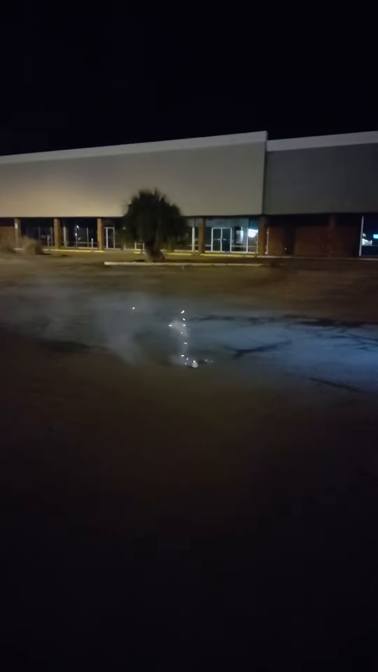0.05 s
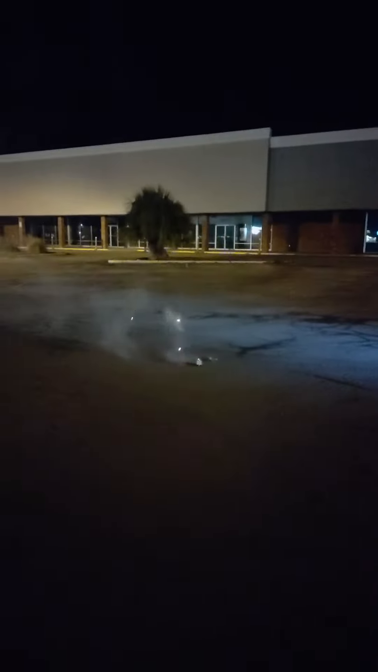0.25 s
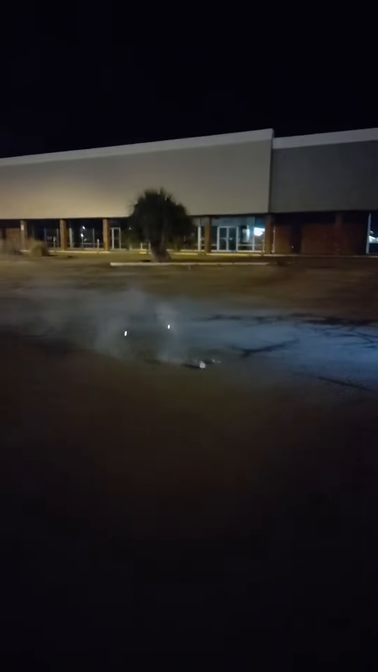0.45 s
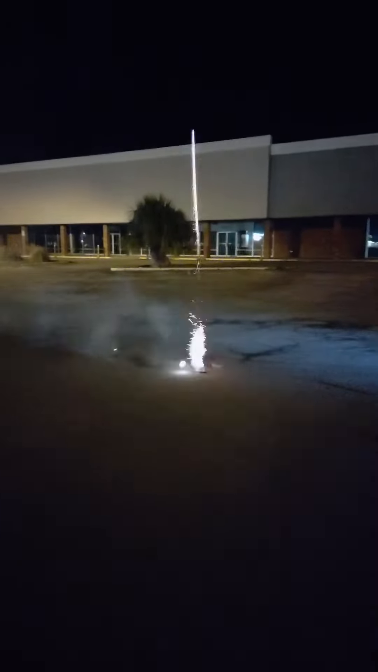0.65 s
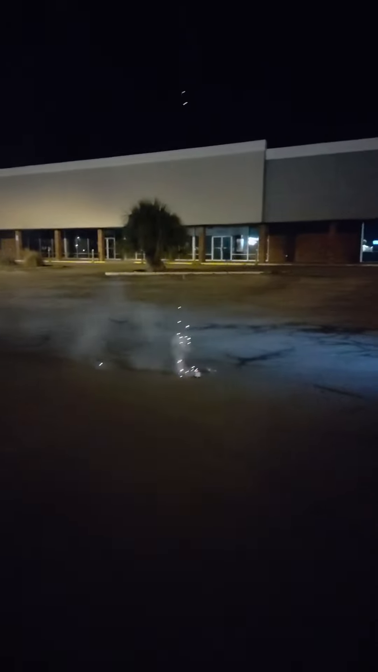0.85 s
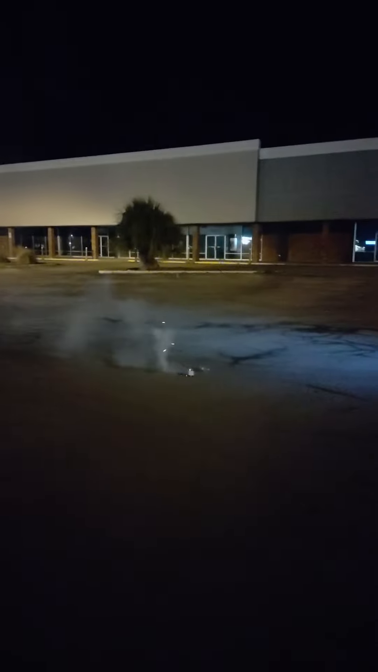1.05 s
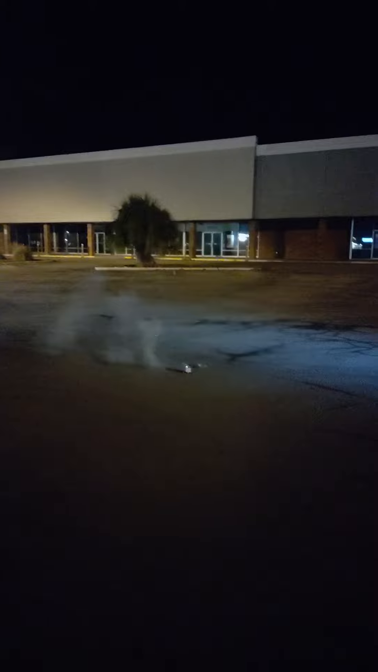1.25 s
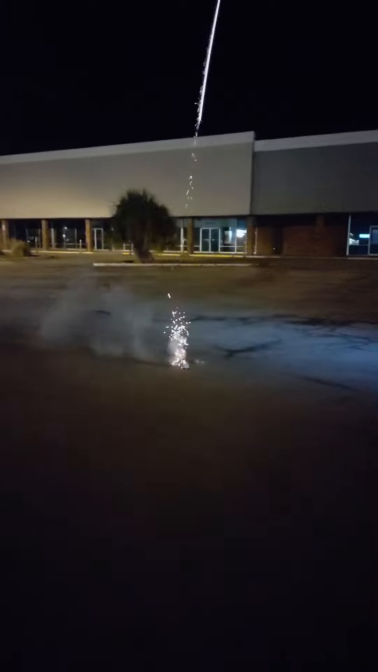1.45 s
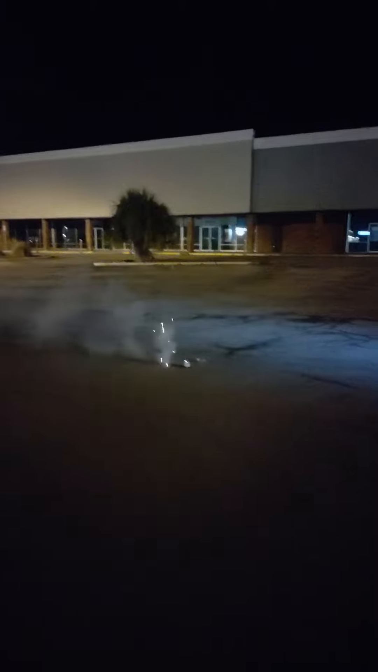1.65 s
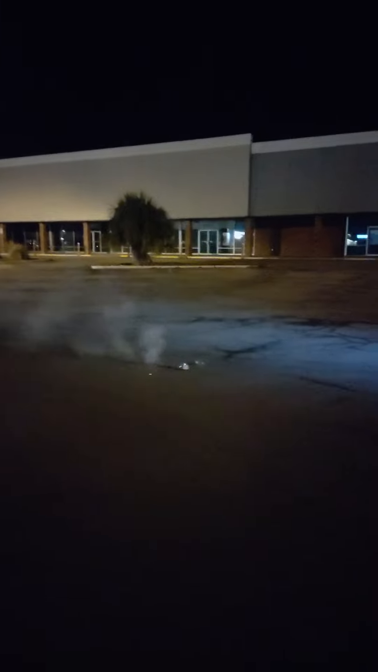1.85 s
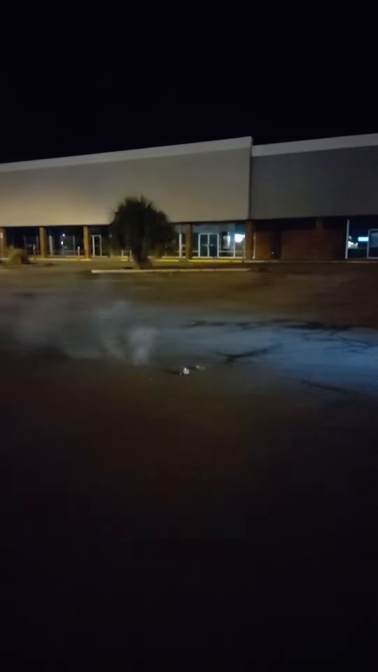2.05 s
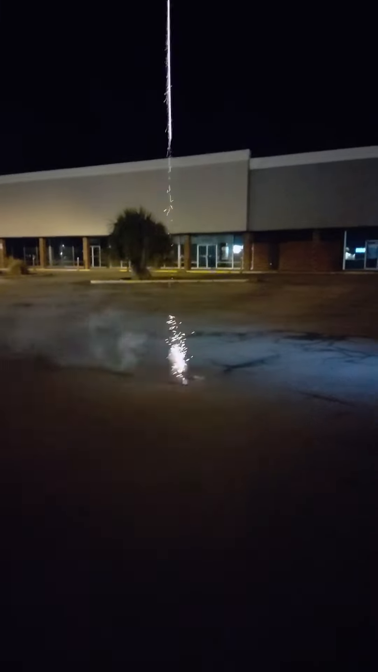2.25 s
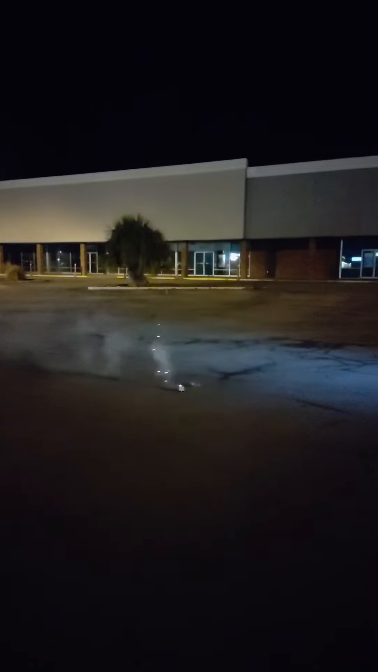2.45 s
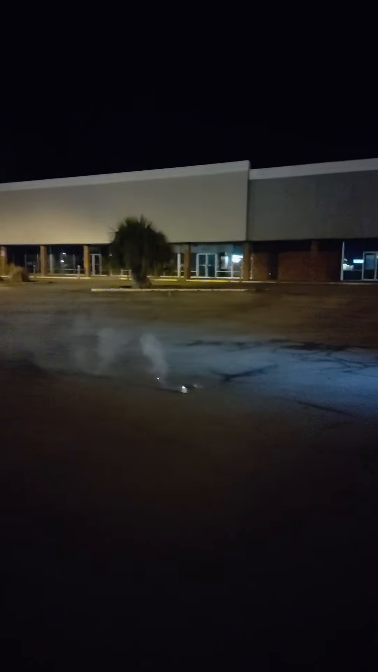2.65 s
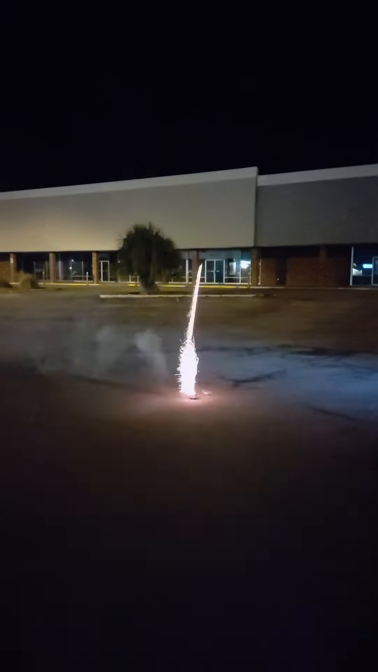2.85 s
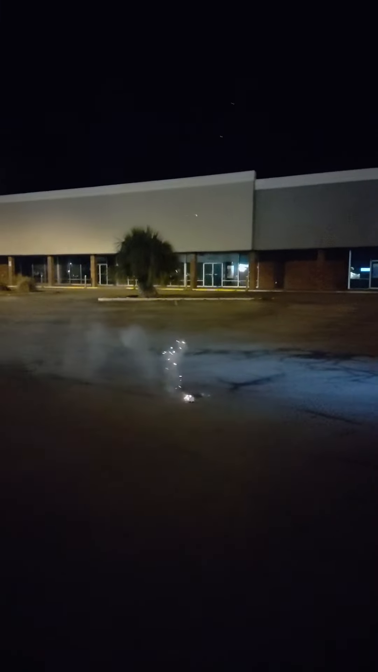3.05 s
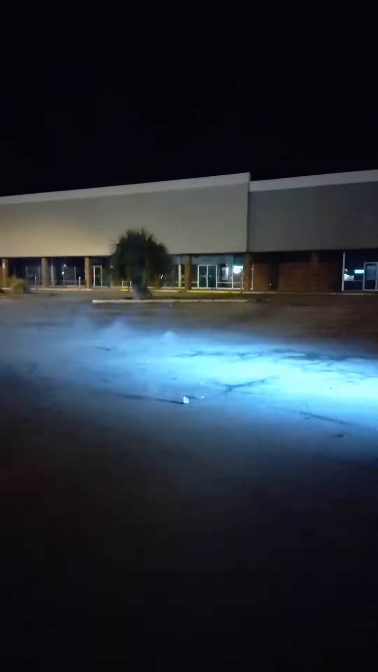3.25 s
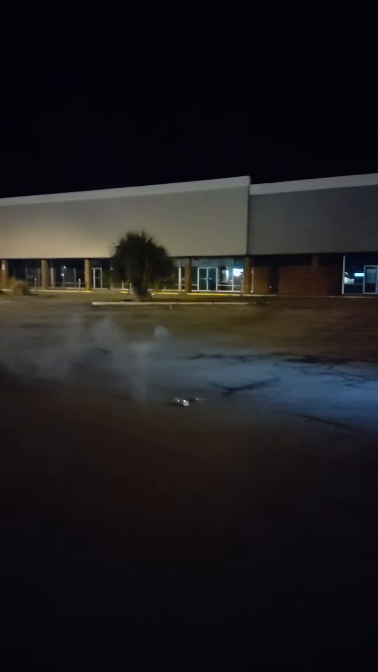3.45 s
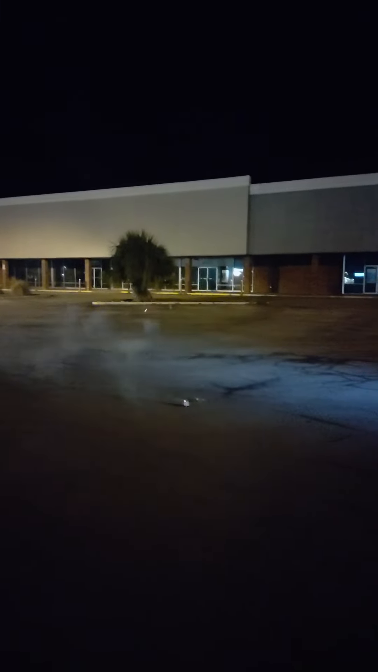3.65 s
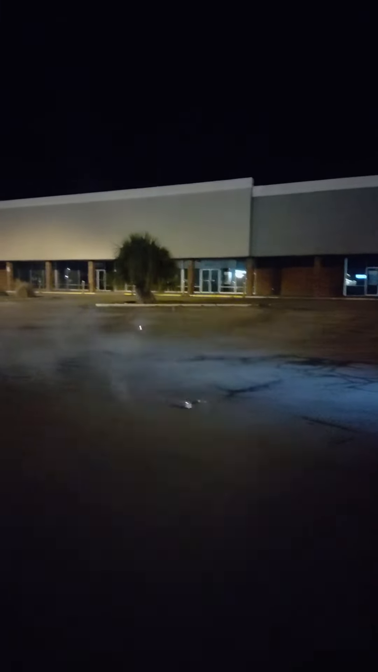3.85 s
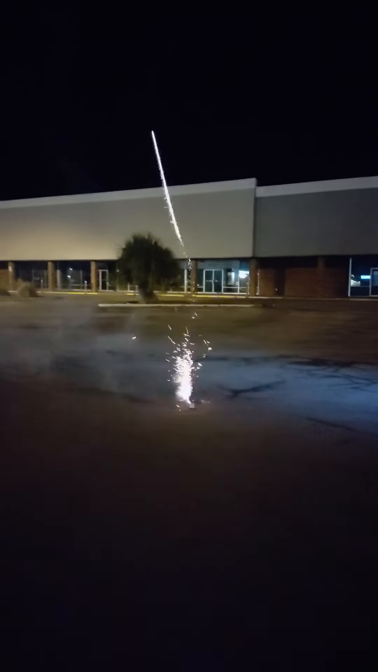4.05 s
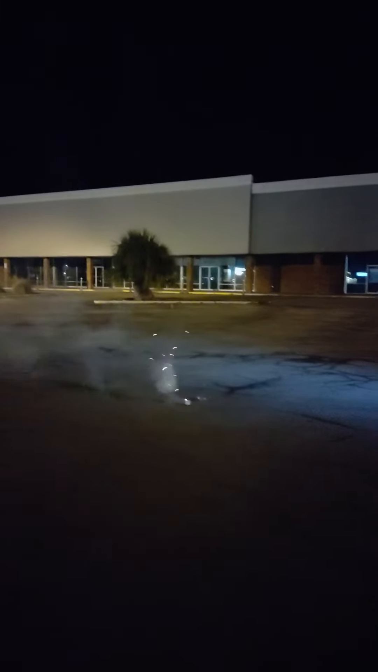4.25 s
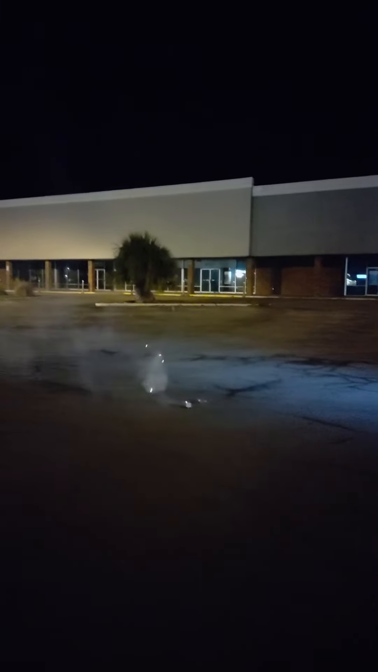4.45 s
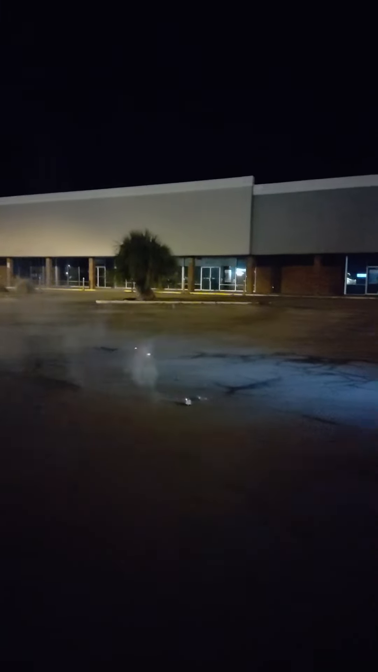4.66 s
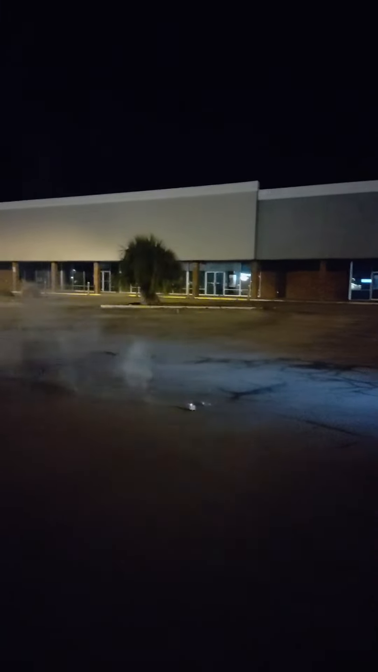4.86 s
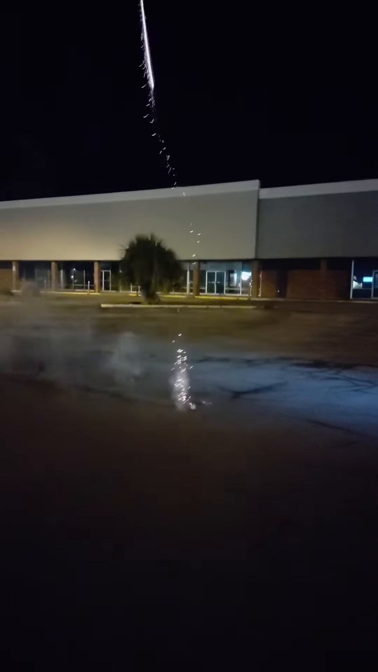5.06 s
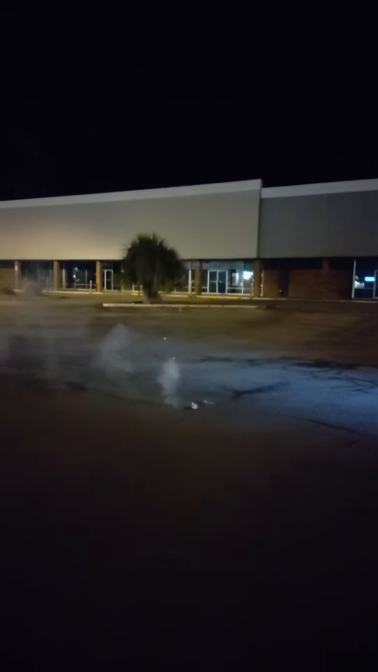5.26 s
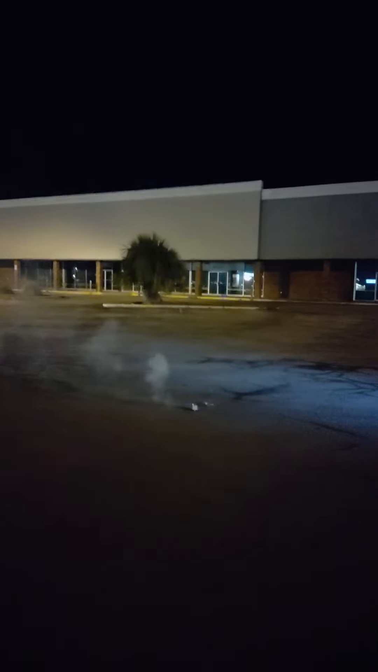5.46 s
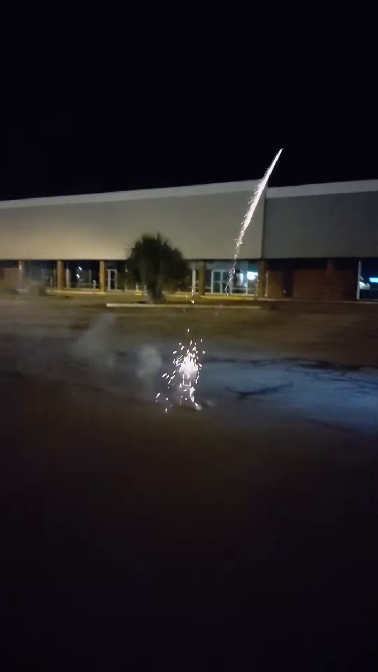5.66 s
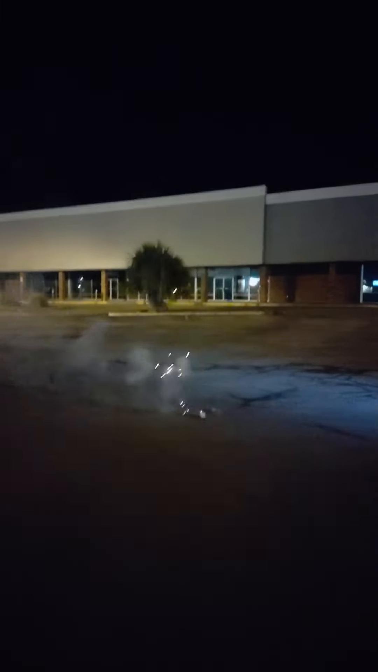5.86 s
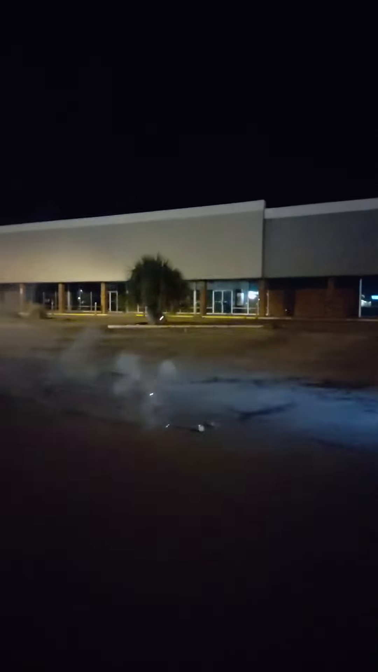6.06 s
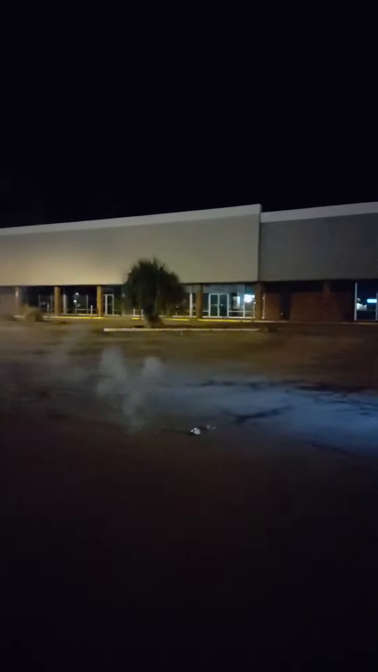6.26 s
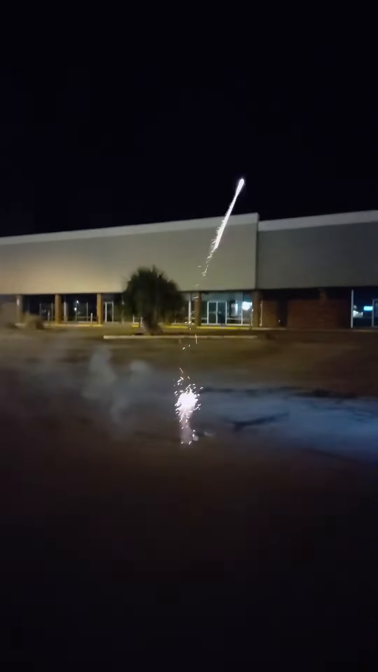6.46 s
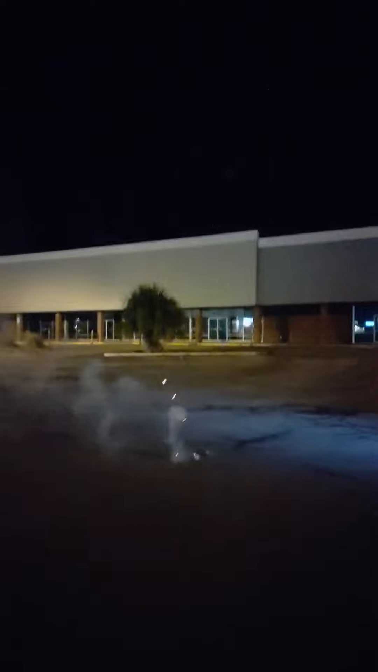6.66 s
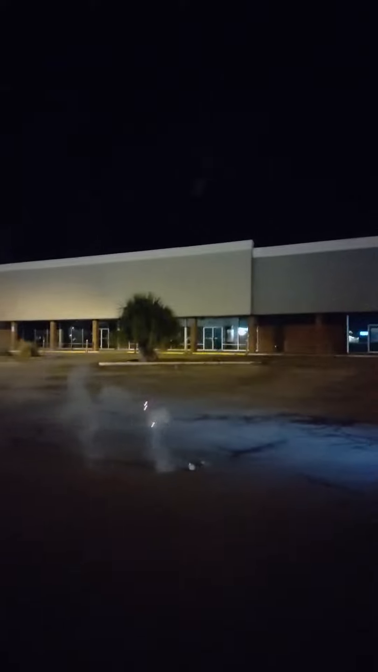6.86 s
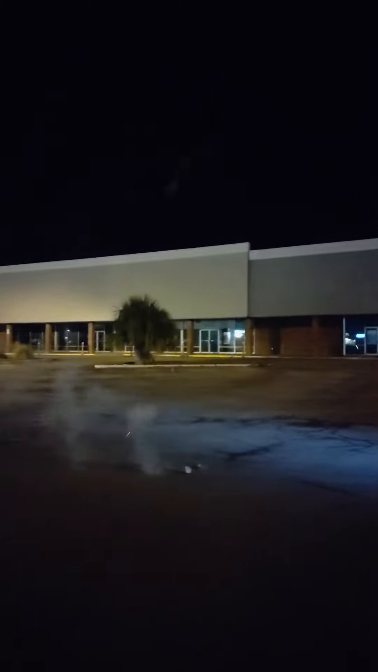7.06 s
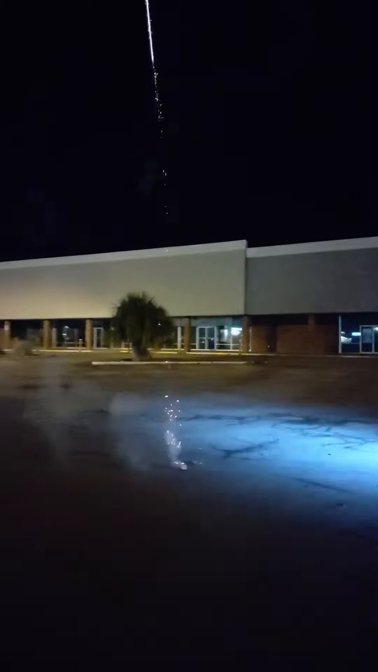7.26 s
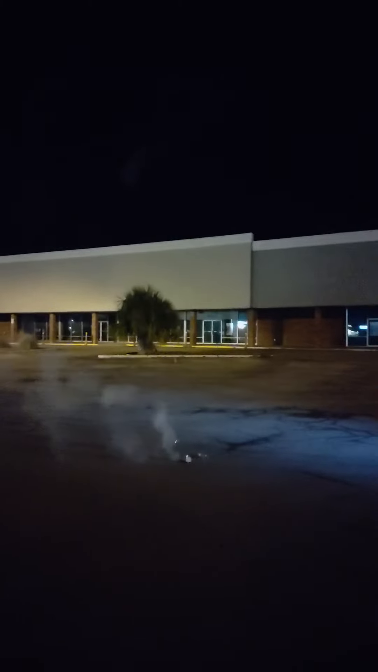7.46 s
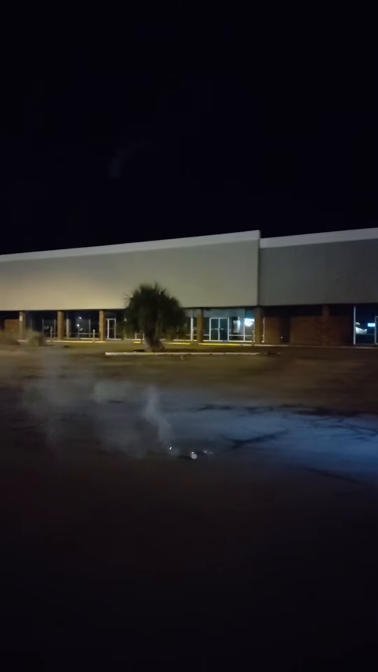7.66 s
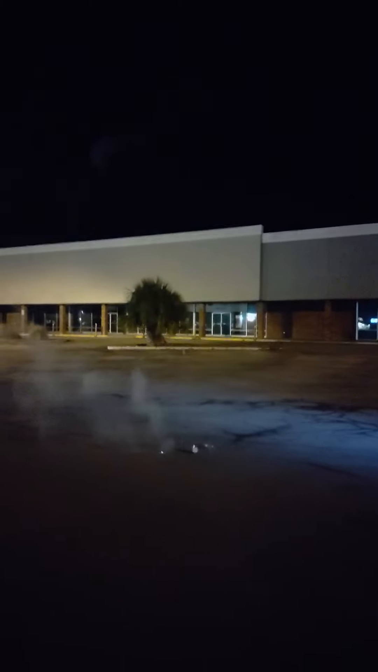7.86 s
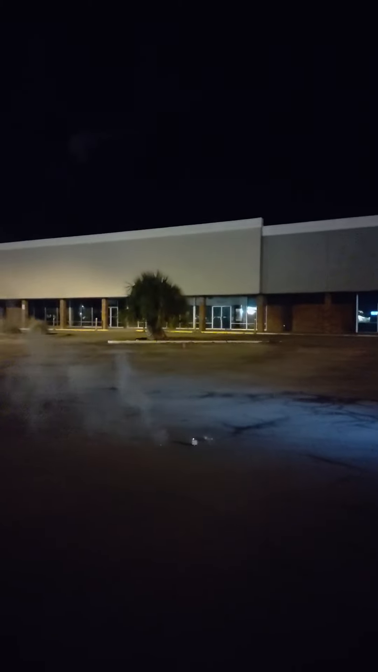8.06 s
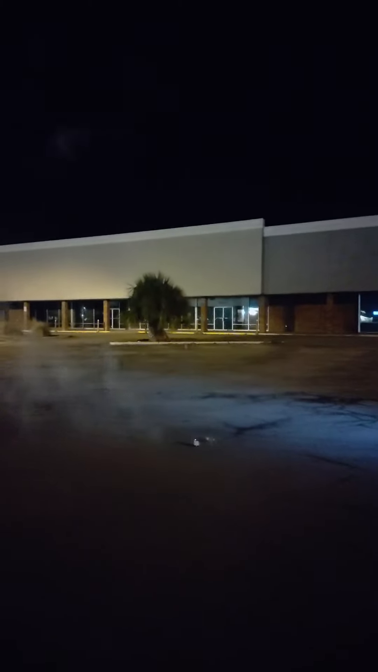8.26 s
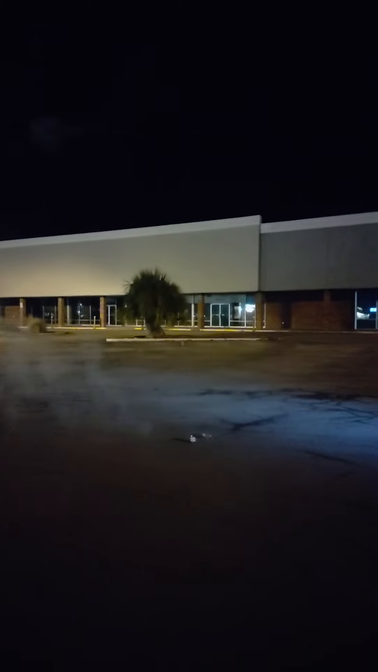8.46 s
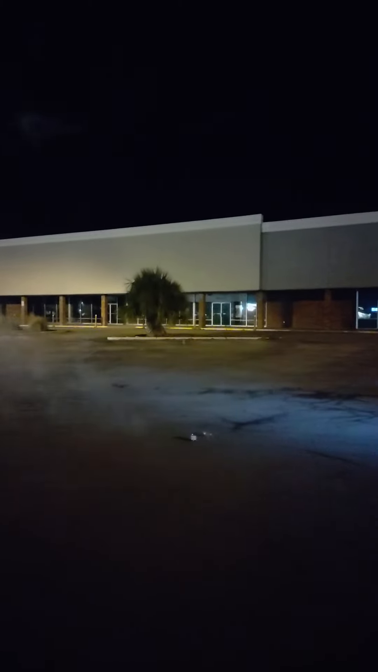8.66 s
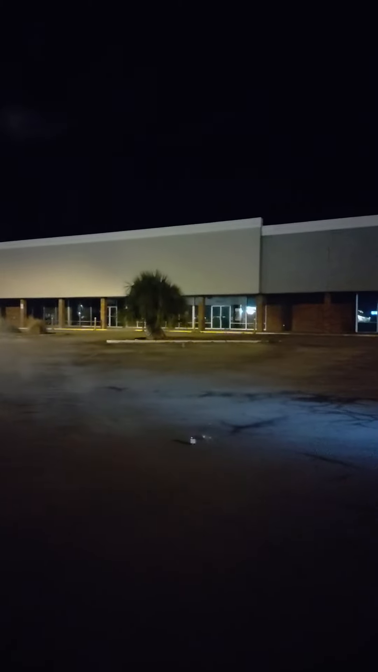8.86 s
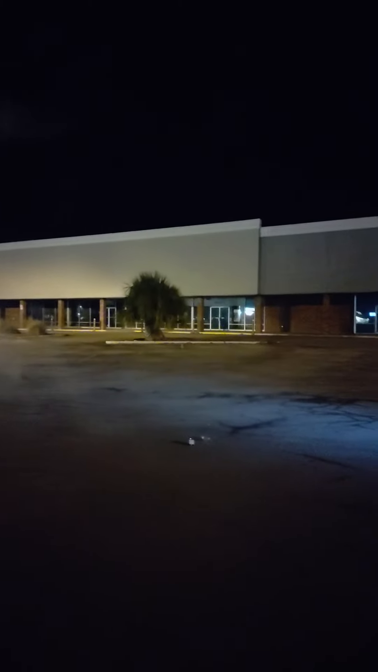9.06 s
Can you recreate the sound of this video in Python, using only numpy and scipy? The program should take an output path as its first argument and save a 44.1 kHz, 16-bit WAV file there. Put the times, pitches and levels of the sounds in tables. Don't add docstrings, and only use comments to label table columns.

```python
import sys
import numpy as np
from scipy import signal
from scipy.fft import rfft, irfft, next_fast_len
from scipy.io import wavfile
from scipy.ndimage import uniform_filter1d

SR = 44100
rng = np.random.default_rng(int(sys.argv[2]) if len(sys.argv) > 2 else 0)


def transcribe(signal):
    frames = np.atleast_2d(signal).T
    limited = np.clip(frames, -1, 1)
    pcm = np.round(limited * 32767).astype(np.int16)
    wavfile.write(sys.argv[1], SR, pcm)


def gain_from_decibels(decibels):
    exponent = np.asarray(decibels, float) / 20
    return 10 ** exponent


N = 402633

# (frequency [Hz], level [dB])
CRACK_SPECTRUM = [(60, -15.5), (500, -10.5), (1400, -6.5), (1750, -2), (2800, -9.5), (4800, -8), (6200, -7),
                  (8000, -26)]
# (frequency [Hz], level [dB])
POP_SPECTRUM = [(60, -10.5), (300, -2.5), (900, -2), (1750, 1), (2600, -10.5), (4500, -11.5), (8000, -29.5)]
# (frequency [Hz], level [dB])
LOT_SPECTRUM = [(30, -47), (100, -24), (300, -26), (600, -14), (1300, -11), (1750, 1.5), (2300, -13),
                (3300, -19), (4600, -10), (6300, -21), (7600, -15), (8400, -48.5)]


def evened(x):
    return x / np.sqrt(np.mean(x ** 2) + 1e-20)


def read(points, hz):
    f, value = np.transpose(points)
    return np.interp(np.log(hz + 1), np.log(f + 1), value)


def add(mix, start_s, sound):
    part = mix[max(round(start_s * SR), 0):][:len(sound)]
    part += sound[:len(part)]


def click(points, size=1024):
    hz = abs(np.fft.fftfreq(size, 1 / SR))
    log_gain = np.log(gain_from_decibels(read(points, hz)))
    spectrum = np.exp(np.conj(signal.hilbert(log_gain)))
    pulse = np.fft.ifft(spectrum).real[:size // 2]
    return pulse / abs(pulse).max()


def puff(size, ms, wake):
    t = np.arange(size) / SR
    return (t == 0) + wake * rng.standard_normal(size) * np.exp(-1000 * t / ms)


def coloured(x, points):
    size = next_fast_len(len(x))
    gain = gain_from_decibels(read(points, np.fft.rfftfreq(size, 1 / SR)))
    return evened(irfft(rfft(x, size) * gain, size)[:len(x)])


def wander(count, hz):
    return evened(signal.lfilter(*signal.butter(2, hz, fs=SR), rng.standard_normal(count)))


def night_air():
    # (frequency [Hz], level [dB])
    air_spectrum = [(30, -24), (100, 8), (300, -1.5), (1000, -11), (1750, -7.5), (3000, -40.5), (5000, -32),
                    (6500, -28), (7600, -30.5), (8400, -49.5)]
    level_db = -50 + 1.5 * wander(N, 5)
    return gain_from_decibels(level_db) * coloured(rng.standard_normal(N), air_spectrum)


def lot_tail(colour, lumpy_db=0.5, rise_s=.03):
    # (frequency [Hz], t60 [s])
    ringing = [(100, 3.9), (1000, 2), (2000, 1.69), (3200, 1.394), (5000, 1), (6500, 0.91), (8000, 0.87)]
    t = np.arange(3 * SR // 2) / SR
    uneven_db = lumpy_db * wander(len(t), 59) + 2.05 * wander(len(t), 420)
    taps = rng.standard_normal(len(t)) * gain_from_decibels(uneven_db)
    hz, frame_s, z = signal.stft(coloured(taps, colour), SR, nperseg=256)
    decay_db = -60 * frame_s / read(ringing, hz)[:, None]
    tail = signal.istft(z * gain_from_decibels(decay_db), SR, nperseg=256)[1][:len(t)]
    return tail * (1 - np.exp(-t / rise_s))


def slaps():
    # (time [s], peak level [dB])
    slap_events = [(0.213, -21), (0.232, -13), (.257, -6), (0.283, -12), (1.066, -20), (1.096, -15),
                   (1.128, -11), (1.928, -13), (1.968, -12.5), (2.793, -21), (2.819, -18.5), (3.545, -38),
                   (3.583, -15), (3.617, -16.5), (4.141, -27.5), (4.572, -19.5), (6.125, -4.5),
                   (6.141, -11.5), (6.155, -10.5), (6.85, -25), (7.51, -13.5), (7.618, -10), (7.744, -15.5),
                   (7.876, -20), (7.939, -18), (8.228, -37), (8.265, -33), (8.476, -15.5), (8.517, -17),
                   (8.905, -46)]
    out = np.zeros(N)
    for s, db in slap_events:
        treble = max(-0.3 * (db + 23.5), 0)
        smear = puff(size=5000, ms=4.5, wake=.9)
        trail = puff(size=5000, ms=30, wake=0.1)
        pulse = click(LOT_SPECTRUM) + 0.51 * click(POP_SPECTRUM) + treble * click(CRACK_SPECTRUM)
        sound = signal.fftconvolve(pulse, smear + trail)
        add(out, s, gain_from_decibels(db + 3.5) * sound / abs(sound).max())
    return out


def strand(t, hz, db, octave_db):
    turn = np.exp(2j * np.pi * np.cumsum(hz) / SR)
    beads = [1.4 + wander(len(t), 45) + 1j * wander(len(t), 45) for _ in range(2)]
    line = gain_from_decibels(db + 6.0) * (turn * beads[0] + gain_from_decibels(octave_db) * turn ** 2 * beads[1])
    return line.real * np.clip(np.minimum(t, t[-1] - t) / 0.0024, 0, 1)


def strands():
    # (start [s], length [s], pitch [Hz], top level [dB], fade [dB/s])
    lingers = [(0.177, 0.46, 3024, -33, 38), (0.884, 0.11, 3200, -43, 3), (1.24, 0.35, 3220, -39.5, 74),
               (1.666, 0.26, 3074, -38.5, 5), (1.978, 0.29, 3070, -40, 47), (3.25, 0.21, 3145, -34, 24),
               (3.484, 0.58, 3095, -48.5, 32), (4.356, 0.606, 3008, -33.5, 54.5),
               (5.259, 0.333, 2983, -37, 17), (6.245, 0.12, 3060, -44, 29), (6.615, .14, 3164, -40, -7),
               (7.552, 0.99, 3034, -35, 52.5)]
    # (start [s], length [s], from [Hz], to [Hz], level [dB])
    chirps = [
        (2.654, 0.065, 3310, 3410, -44),
        (3.367, 0.082, 3030, 3210, -45),
        (4.5, 0.03, 3450, 3500, -36),
        (4.533, .02, 3480, 3900, -34),
        (6.064, 0.013, 3080, 4040, -32.5),
        (6.66, .012, 3300, 4060, -41),
        (6.784, 0.0081, 3360, 4100, -40),
    ]
    out = np.zeros(N)
    for s, length_s, hz, db, fade in lingers:
        t = np.arange(0, length_s, 1 / SR)
        top_s = 0.11 * length_s
        swell_db = -8.5 * np.maximum(1 - t / top_s, 0)
        level_db = db + swell_db - fade * np.maximum(t - top_s, 0)
        sagging_hz = hz * (1 - .04 * t + 0.01 * wander(len(t), 15))
        add(out, s, strand(t, sagging_hz, level_db, octave_db=-15.5 - 41 * t))
    for s, length_s, low_hz, high_hz, db in chirps:
        t = np.arange(0, length_s, 1 / SR)
        rising_hz = low_hz + (high_hz - low_hz) * (t / length_s) ** 0.56
        add(out, s, strand(t, rising_hz, db, octave_db=-19))
    return out


def bursts():
    # (time [s], ground echo lag [s], echo level [dB], boom level [dB], first wall lag [s])
    burst_events = [(0.1276, 0.0072, -18, -32, .094), (0.9663, 0.0075, -23, -62, 0.084),
                    (1.8066, 0.0088, -24, -47.5, 0.074), (2.7144, 0.0088, -24, -68, 0.092),
                    (3.4558, 0.0078, -25.5, -40.5, 0.08), (4.0437, 0.0084, -31, -51.5, 0.1),
                    (5.0564, 0.009, -77, -61, 0.095), (5.9536, .0081, -20.5, -75.5, .09),
                    (6.7512, 0.0075, -25, -71, 0.09), (7.3784, 0.0065, -20, -39.5, 0.1),
                    (8.38, 0.0085, -27.5, -45, .065)]
    near, far = np.zeros((2, N))
    t = np.arange(SR // 2) / SR
    ring = np.sin(2 * np.pi * 100 * t)
    lead = np.sin(2 * np.pi * 1800 * t[:220]) * np.hanning(220)
    for s, ground_s, echo_db, boom_db, wall_s in burst_events:
        for delay_s, loss_db in ((0, 0), (ground_s, -1.5)):
            shock = np.convolve(click(CRACK_SPECTRUM), puff(size=600, ms=.65, wake=.8))
            add(near, s + delay_s - .0003, gain_from_decibels(3 + loss_db) * shock / abs(shock).max())
        add(near, s - .006, gain_from_decibels(-19) * lead)
        add(far, s + ground_s, gain_from_decibels(echo_db - 16) * lot_tail(LOT_SPECTRUM, rise_s=0.003))
        add(far, s + wall_s, gain_from_decibels(echo_db) * lot_tail(LOT_SPECTRUM, rise_s=0.0093))
        add(near, s - .005, gain_from_decibels(boom_db + 17.0) * ring * np.exp(-t / 0.015))
        add(near, s + 0.04456, gain_from_decibels(boom_db - 1) * ring * (t / 0.021) ** 2 * np.exp(-t / 0.044))
        add(near, s + 0.1199, gain_from_decibels(boom_db) * ring * np.minimum(t / 0.015, 1) * np.exp(-t / 0.035))
    return near, far


def pops():
    # (time [s], peak level [dB], echo level [dB])
    pop_events = [(0.604, -10, -27.5), (0.681, -10.5, -42.5), (0.686, 1.5, -60), (1.447, -0.5, -41.5),
                  (2.264, 3, -43), (2.927, 1, -45.5), (3.983, -13.5, -28.5), (4.073, -4.5, -18.5),
                  (4.996, -6, -19.5), (5.649, -7.5, -31), (6.451, -1.5, -48), (7.205, -1, -44)]
    near, far = np.zeros((2, N))
    for s, db, echo_db in pop_events:
        thump = np.convolve(click(POP_SPECTRUM), puff(size=900, ms=3.5, wake=.1))
        add(near, s, gain_from_decibels(db - 1.5) * thump)
        add(far, s + 0.0028, gain_from_decibels(db + echo_db) * lot_tail(LOT_SPECTRUM, rise_s=0.043))
    return near, far


def burn(pitch, lit_s, levels, voice):
    # (middle [s], half length [s], fifth above [dB])
    stutters = [(0.01, 0.16, -19), (0.888, 0.078, -26.5), (1.474, .04, -29), (1.725, .08, -30),
                (2.431, 0.065, -21), (2.621, 0.021, -25.5), (2.969, 0.031, -47), (4.237, 0.25, -22),
                (5.073, 0.087, -16), (5.693, 0.058, -28), (7.257, 0.01, -35)]
    out_s, *whistle_db = levels
    octave, coast_octave, jet_lit, jet_out, third_db = voice
    s, hz = np.transpose(pitch)
    t = np.arange(max(lit_s, 0), s[-1], 1 / SR)
    marks_s = [lit_s, out_s, out_s + .008, s[-1] + .001]
    db = np.interp(t, marks_s, whistle_db)
    octave_db = db + np.interp(t, marks_s, [octave, octave, coast_octave, coast_octave - 7])
    octave_db -= 7 * np.exp(-((t - lit_s) / 0.09) ** 2)
    steady_db = -56.5
    spells = [top - (top - steady_db) * np.minimum(((t - mid) / half) ** 2, 1)
              for mid, half, top in stutters]
    fifth_db = np.max(spells, axis=0)
    jet_db = np.interp(t, marks_s, [jet_lit, jet_out, -17, -17])
    return t, np.interp(t, s, hz), db, octave_db, fifth_db, jet_db, out_s, third_db


def whistle(flight, lit_s, climb):
    # (frequency [Hz], level [dB])
    jet_spectrum = [(60, -60), (1500, -25), (2400, -10), (3600, -4), (4500, 5), (5400, -1.5), (6800, 4),
                    (7600, 0.5), (8500, -31)]
    first, beat_hz, slowing_s, wall_db, blur_db = climb
    t, hz, db, octave_db, fifth_db, jet_db, out_s, third_db = flight
    count = len(t)
    age_s = np.maximum(t - lit_s, 0)
    beat = beat_hz / (1 + (age_s / slowing_s) ** 2) * (1 + .12 * wander(count, 41))
    catch = first / (1 + (age_s / .009) ** 7) * (1 + .25 * wander(count, 490))
    flutter = 0.029 * np.exp(-abs(t - out_s) / 0.011) * abs(wander(count, 140))
    turns = np.cumsum(hz * (1 + catch + flutter + .003 * wander(count, 70))) / SR
    lag = np.cumsum(beat) / SR + rng.random()
    ground = .62 * (1 - .6 * np.exp(-(age_s / .055) ** 2))
    ground = ground * np.interp(t, [out_s, out_s + .03], [1, .45])
    whole = ((1, db), (2, octave_db), (3, octave_db + third_db))
    halves = ((1 / 2, fifth_db - 24), (3 / 2, fifth_db), (5 / 2, fifth_db - 14.5))
    tone = 0
    for k, level_db in (*whole, *halves):
        direct = np.sin(2 * np.pi * k * (turns + lag / 2))
        reflected = ground * np.sin(2 * np.pi * k * (turns - lag / 2))
        level = gain_from_decibels(level_db + 1.78 * wander(count, 73))
        tone = tone + level * (direct + reflected) * np.sqrt(2 / (1 + ground ** 2))
    hiss = coloured(rng.standard_normal(count), jet_spectrum)
    jet = gain_from_decibels(db + jet_db + 2.0 * wander(count, 44)) * hiss
    sound = (tone + jet) * np.clip(np.minimum(age_s / 0.002, (t[-1] - t) / 0.005), 0, 1)
    to_walls = sound * gain_from_decibels(wall_db - 84 * age_s) * np.minimum(age_s / 0.16, 1) ** 2
    to_blur = sound * gain_from_decibels(blur_db - 8 * age_s)
    return sound, to_walls, to_blur


def rockets():
    lit_times = [-.15, .6945, 1.4565, 2.274, 2.935, 4.092, 5.009, 5.664, 6.461, 7.221]
    # (time [s],
    # pitch [Hz])
    pitches = [
        [(0, 2920), (.1, 2700), (.184, 2630), (.19, 2950)],
        [(.708, 2930), (.745, 3173), (.89, 2825), (1.046, 2630), (1.1, 2660), (1.108, 2790), (1.169, 3060),
         (1.25, 2904)],
        [(1.47, 2970), (1.51, 3056), (1.56, 2937), (1.73, 2590), (1.83, 2540), (1.882, 3020), (1.98, 2908)],
        [(2.283, 3015), (2.407, 2890), (2.447, 2706), (2.48, 2770), (2.497, 3100), (2.56, 3070), (2.63, 2990),
         (2.7, 3090)],
        [(2.987, 3022), (3.197, 2736), (3.225, 2703), (3.245, 2936), (3.3, 3045), (3.4, 2885)],
        [(4.122, 3023), (4.19, 2900), (4.31, 2638), (4.34, 2683), (4.346, 3200), (4.372, 3090), (4.392, 3820)],
        [(5.022, 3014), (5.1, 3150), (5.235, 2884), (5.254, 2720), (5.262, 3510)],
        [(5.69, 3054), (5.762, 2966), (5.885, 2794), (5.9, 2635), (5.912, 2770), (5.922, 3300)],
        [(6.474, 3037), (6.538, 2970), (6.592, 2872), (6.605, 3470)],
        [(7.234, 3040), (7.258, 3117), (7.294, 2997), (7.375, 2844), (7.498, 2653), (7.55, 2796)],
    ]
    # (burn-out [s], lit [dB], burn-out [dB], coast start [dB], last [dB])
    burn_levels = [(0.173, -8, -20.5, -15, -32), (1.102, -11.5, -19, -18, -28.5),
                   (1.83, -12, -18.5, -19.5, -28.5), (2.479, -11, -16.5, -20.5, -30.5),
                   (3.225, -10.5, -15.5, -14.5, -31), (4.339, -12, -17.5, -21.5, -15),
                   (5.254, -11, -12.5, -17.5, -32.5), (5.905, -11.5, -16, -13, -20.5),
                   (6.59, -11, -17, -15, -39), (7.519, -11, -20.5, -22, -43)]
    # (octave [dB], coasting octave
    # [dB], jet hiss when lit [dB], jet hiss at burn-out [dB], third partial [dB])
    voices = [(-3, -7, -10.5, -2.5, -28), (-2, -8.5, -10.5, -13, -22), (-1, -11, -14, -6.5, -17.5),
              (-2, -3, -10, -14.5, -29.5), (-4, -7, -9.5, -15, -30.5), (-2.5, -2.5, -13, -11.5, -31),
              (-6, 4, -17, -11.5, -27), (-2.5, -8.5, -11.5, -18, -34.5), (0, -11, -9, -14.5, -30),
              (-3.5, 3.5, -14.5, -3, -23)]
    # (first note above pitch [0-1], ground beat [Hz], beat slowing [s], wall echo [dB], blur [dB])
    climbs = [(0.6, 110, 0.25, -14.5, -12), (.22, 140, 0.15, -15, -11), (.18, 123, 0.16, -11.5, -15.5),
              (.1, 100, 0.2, -19, -7), (.2, 140, 0.12, -18, -12), (.05, 95, .19, -21, -10.5),
              (0.2, 130, 0.283, -13, -11), (.13, 190, 0.088, -26.5, -4), (.18, 103, 0.43, -25, -6.5),
              (.12, 107, 0.18, -15, -8.5)]
    # (lag [s], level [dB])
    wall_echoes = [(.075, -22.5), (0.17, 12.5), (0.201, -1), (0.263, 7.5), (0.332, -0.5), (0.451, -24)]
    # (frequency [Hz], level [dB])
    blur_spectrum = [(1000, -14.5), (2750, -13), (2980, -10), (3150, 1.5), (3400, 0), (5600, -17),
                     (6100, -4), (6600, -3), (8500, 0)]
    near, to_walls, to_blur, far = np.zeros((4, N))
    for pitch, lit_s, levels, voice, climb in zip(pitches, lit_times, burn_levels, voices, climbs):
        flight = burn(pitch, lit_s, levels, voice)
        for mix, sound in zip((near, to_walls, to_blur), whistle(flight, lit_s, climb)):
            add(mix, lit_s, sound)
    for lag_s, db in wall_echoes:
        add(far, lag_s, gain_from_decibels(db) * to_walls)
    blur = lot_tail(blur_spectrum, rise_s=0.12)
    blur = blur / np.linalg.norm(blur)
    return near, far + gain_from_decibels(-8.0) * signal.fftconvolve(to_blur, blur)[:N]


def ducking(loud, start_db, depth, fall_db):
    power_db = 10 * np.log10(abs(uniform_filter1d(loud ** 2, size=60)) + 1e-12)
    fall = np.arange(N) * fall_db / SR
    held_db = np.maximum.accumulate(power_db + fall) - fall
    over_db = np.maximum(held_db - start_db, 0)
    return gain_from_decibels(-depth * uniform_filter1d(over_db, size=60))


def scene():
    song, song_far = rockets()
    pop, pop_far = pops()
    bang, bang_far = bursts()
    under_song = ducking(song, start_db=-19.5, depth=1.0, fall_db=205)
    under_bang = ducking(bang, start_db=-23.5, depth=0.23, fall_db=176)
    far = (song_far + pop_far + bang_far + night_air()) * under_song * under_bang
    held = song * ducking(bang, start_db=-16.5, depth=0.91, fall_db=92.5)
    held = held * ducking(bang, start_db=-15.5, depth=1.0, fall_db=1469)
    mono = held + pop + bang + slaps() + strands() + far
    return np.array([mono, mono])


def roll_off(x):
    return signal.sosfilt(signal.butter(12, 8740, fs=SR, output="sos"), x)


def record(dry):
    held = dry / (1 + (dry / .8) ** 6) ** (1 / 6)
    edge = signal.firwin(255, 8290, window=("kaiser", 7), fs=SR)[None]
    mix = signal.oaconvolve(held, edge, "same")
    return roll_off(mix)


dry = scene()
out = record(dry)
transcribe(out)
```